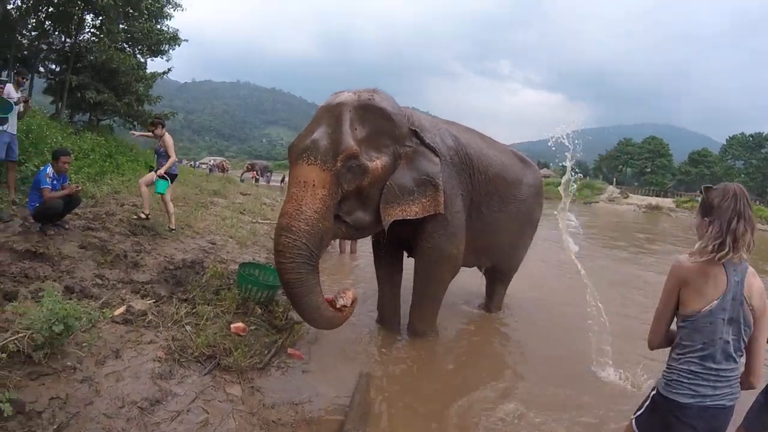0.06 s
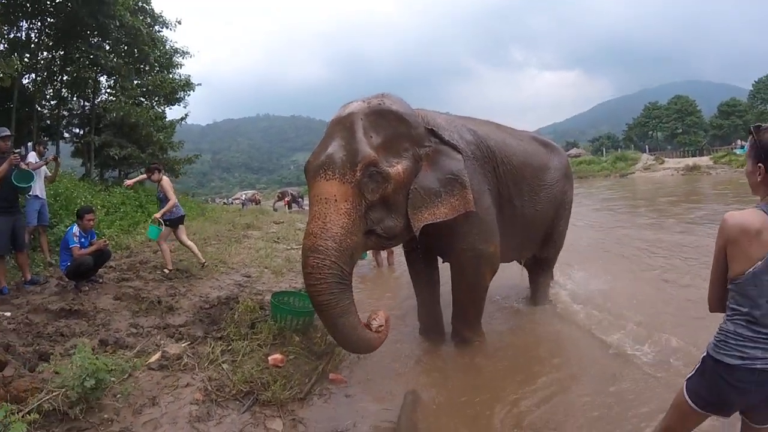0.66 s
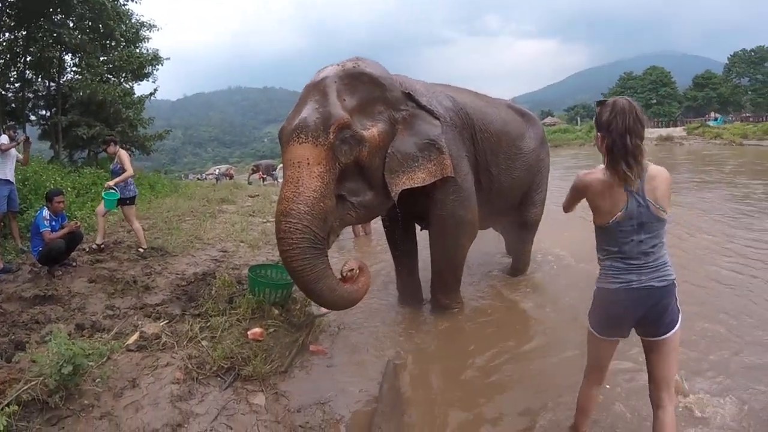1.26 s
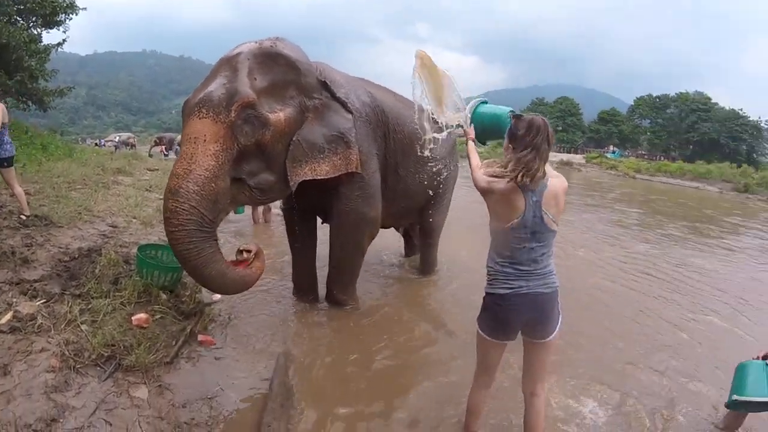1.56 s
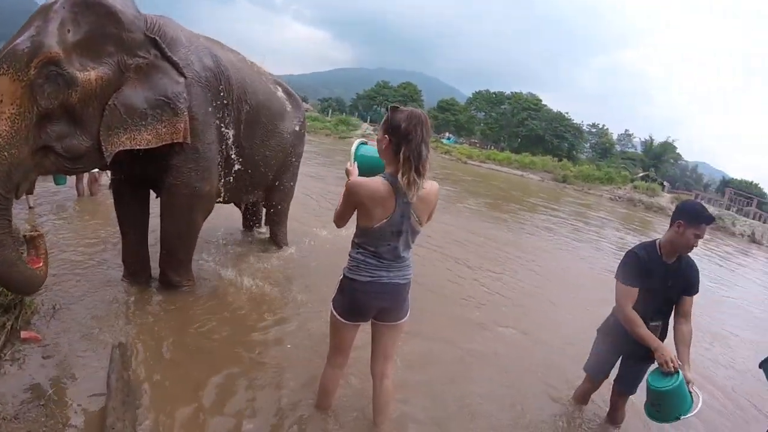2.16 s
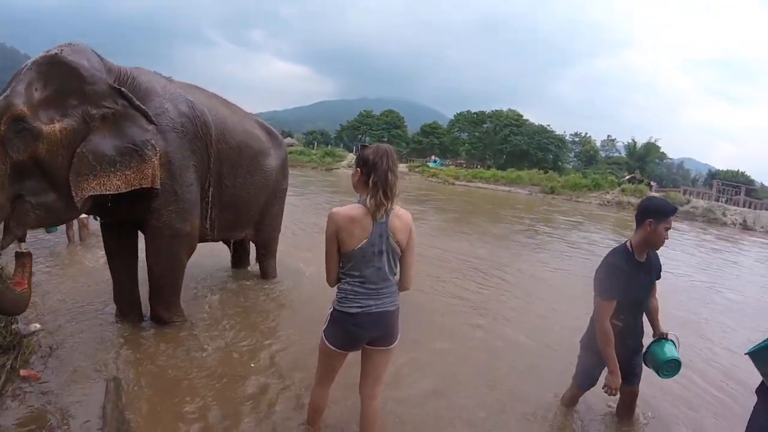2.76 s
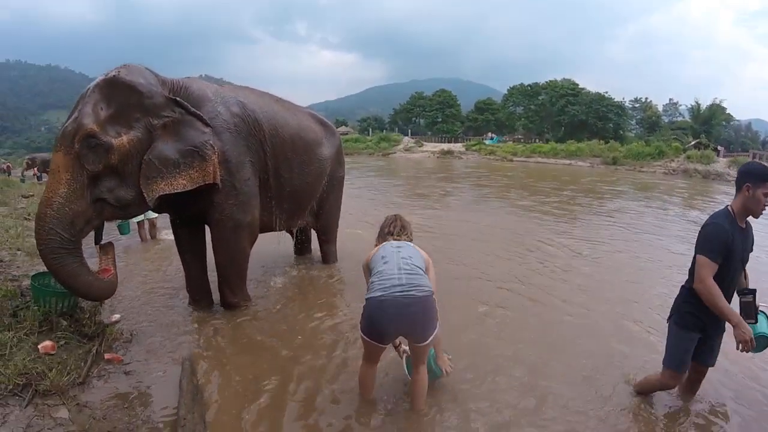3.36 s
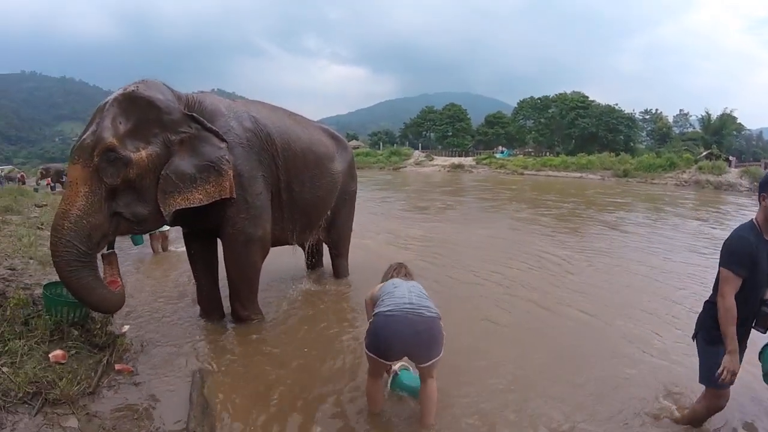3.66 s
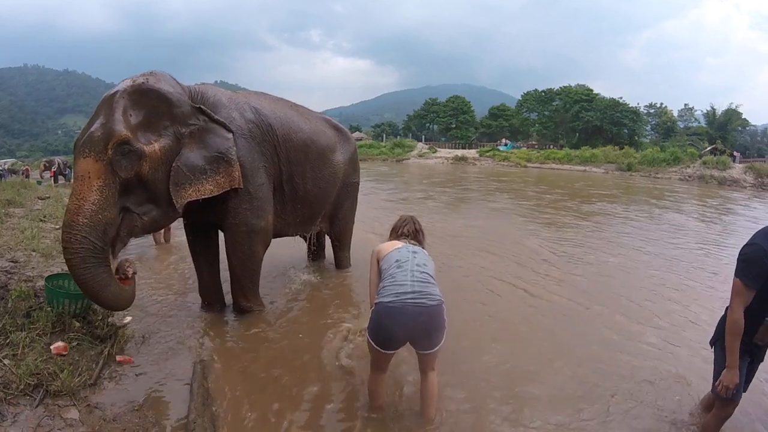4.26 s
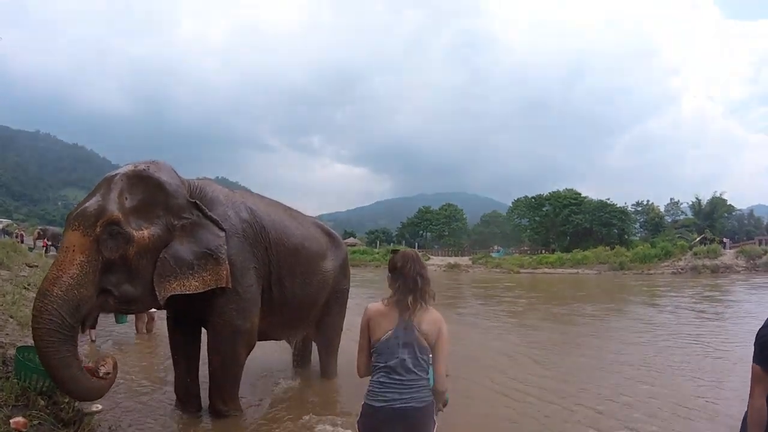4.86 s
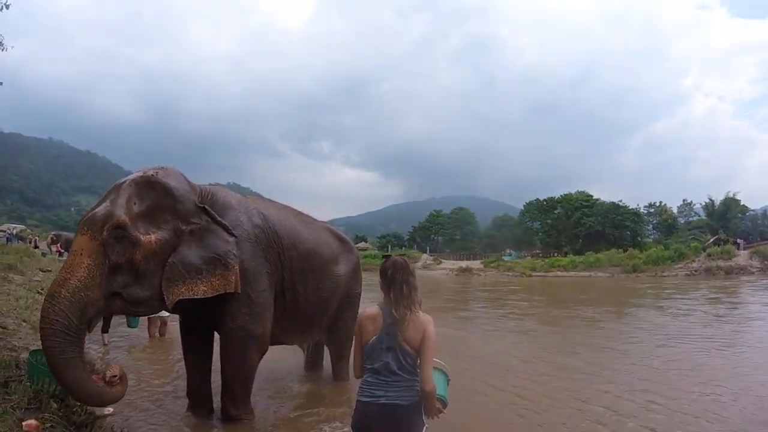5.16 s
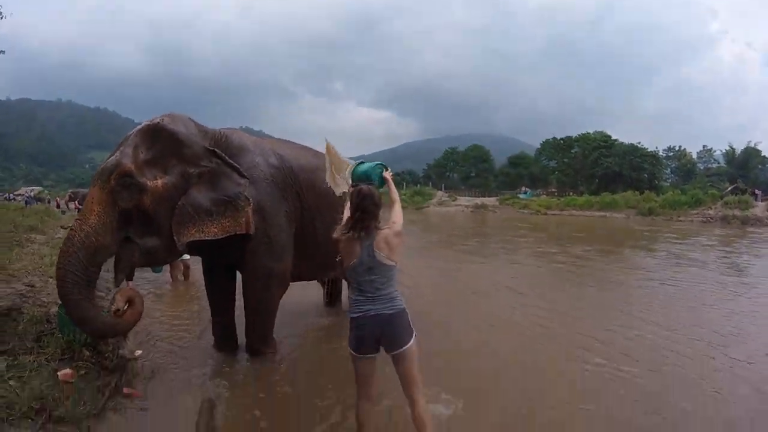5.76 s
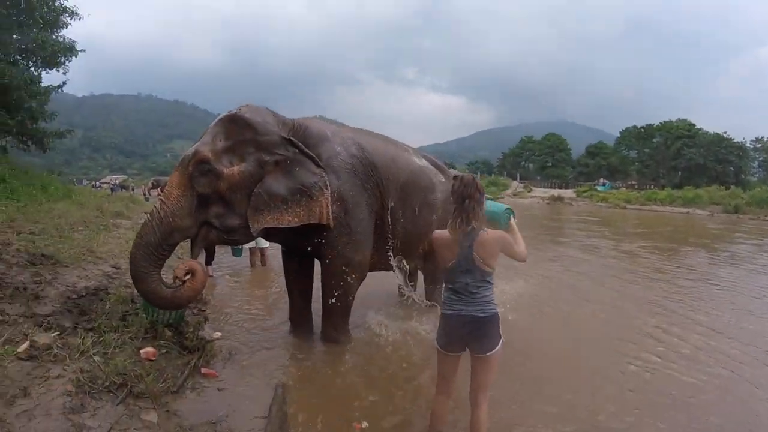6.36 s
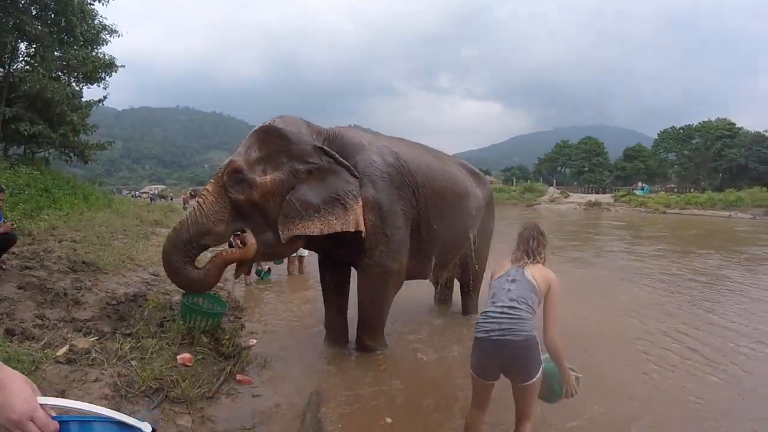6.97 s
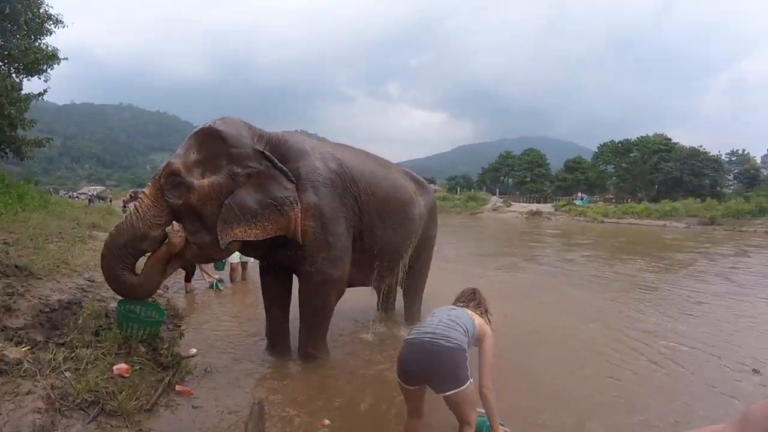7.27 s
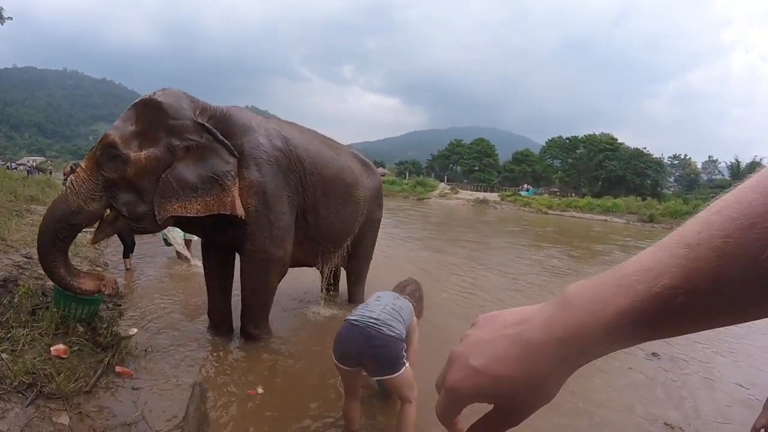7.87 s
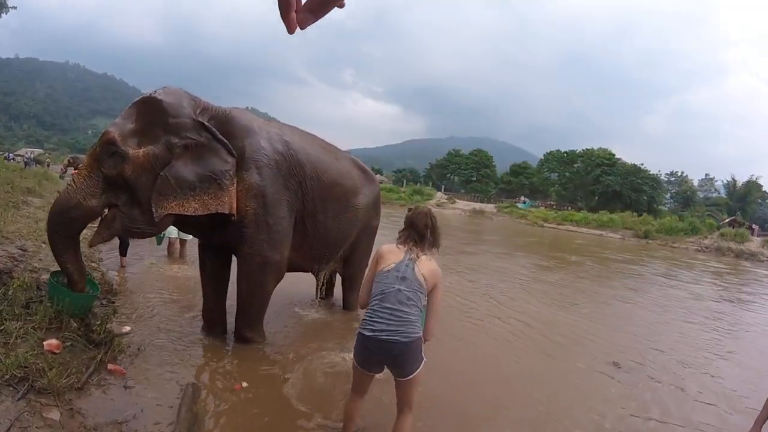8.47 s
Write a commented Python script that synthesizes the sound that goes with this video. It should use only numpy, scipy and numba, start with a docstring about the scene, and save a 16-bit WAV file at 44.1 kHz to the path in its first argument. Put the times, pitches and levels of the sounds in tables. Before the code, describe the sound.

A shallow river washes steadily as buckets of water are thrown over an elephant, landing in fizzy splashes and dripping off. Wading legs and scooping buckets slosh and plop between throws. The water is fairly quiet, heard through the housing of a hand-held camera that rumbles softly. Around halfway, loud sharp knocks hit the housing in two clusters, then more splashing and sloshing follow.

```python
"""Water splashes over the steady wash of a shallow river: buckets are scooped and thrown over an elephant
while people wade nearby. Ringing bubbles make the slosh and plops, tiny drops the spray and run-off.
It is all heard through the housing of a hand-held camera, which adds two narrow rings to the water.
The hand rumbles, jolts and rubs the housing and, from about halfway, knocks sharply on it;
after the hardest knocks a limiter holds everything down."""
import sys
import numpy as np
from scipy import signal
from scipy.fft import rfft, irfft, next_fast_len
from scipy.io import wavfile
from scipy.ndimage import uniform_filter1d, minimum_filter1d
from numba import njit

SR = 44100
rng = np.random.default_rng(int(sys.argv[2]) if len(sys.argv) > 2 else 0)


def generate_wav(sig):
    """Save sig (samples, or channels by samples) to the path in sys.argv[1] as 16-bit PCM at SR."""
    pcm = np.round(np.clip(np.atleast_2d(sig).T, -1, 1) * 32767).astype(np.int16)
    wavfile.write(sys.argv[1], SR, pcm)


N = 380141


def undb(db):
    """Decibels to gain."""
    return 10 ** (np.asarray(db) / 20)


def unit(x):
    """Scale to rms 1."""
    return x / np.sqrt(np.mean(x ** 2))


def colour(x, points):
    """EQ by a curve of (freq_hz, gain_db) points, then scale to rms 1."""
    hz, db = np.transpose(points)
    size = next_fast_len(N)
    bins_hz = np.maximum(np.fft.rfftfreq(size, 1 / SR), 1)
    curve = undb(np.interp(np.log(bins_hz), np.log(hz), db))
    return unit(irfft(rfft(x, size) * curve, size)[:N])


def cut(x, order, hz, kind):
    """Low-, high- or band-pass filter."""
    return signal.sosfilt(signal.butter(order, hz, kind, fs=SR, output="sos"), x)


def drift(rate_hz):
    """Random steps smoothed twice into a wandering line; rms 1."""
    step = int(SR / rate_hz)
    steps = np.repeat(rng.standard_normal(N // step + 1), step)
    return unit(uniform_filter1d(uniform_filter1d(steps, step), step)[:N])


def swell(full_s, hold_s, rise_s, fall_s):
    """Envelope that ramps up to 1 at full_s, holds, then dies away."""
    t = np.arange(N) / SR - full_s
    return np.clip(1 + t / rise_s, 0, 1) * np.exp(-np.maximum(t - hold_s, 0) / fall_s)


def swells(cues, rise_s, fall_s):
    """One envelope for each (full_s, hold_s, level_db) cue."""
    return np.array([undb(db) * swell(s, hold_s, rise_s, fall_s) for s, hold_s, db in cues])


def add(out, start_s, sound):
    """Mix a sound in at start_s."""
    i = max(int(start_s * SR), 0)
    out[i:i + len(sound)] += sound[:max(len(out) - i, 0)]


def modes(table, t):
    """One dying sine per mode; neighbouring modes swing in opposite directions."""
    hz, db, t60_s = np.transpose(table)[:, :, None]
    sides = (-1) ** np.arange(len(table))[:, None]
    return sides * undb(db) * np.sin(2 * np.pi * hz * t) * np.exp(-np.log(1000) * t / t60_s)


@njit
def bubbles(out_size, start_s, hz, cycles, gain, glide):
    """Each bubble rings for some cycles and rises in pitch as it nears the surface."""
    out = np.zeros(out_size)
    for k in range(len(start_s)):
        first, life = int(start_s[k] * SR), int(cycles[k] * SR / hz[k]) + 2
        ring = gain[k] + 0j
        step = np.exp(2j * np.pi * hz[k] / SR - 6 / life)
        bend = np.exp(2j * np.pi * hz[k] / SR * glide / life)
        for i in range(first, min(first + life, out_size)):
            ring *= step
            step *= bend
            out[i] += ring.imag
    return out


def swarm(count, low_hz, high_hz, cycles, scatter_db):
    """Bubbles or drops at random moments; a few are louder, or softer if scatter_db is negative."""
    when, pitch, life, size = rng.random((count, 4)).T
    hz = low_hz * (high_hz / low_hz) ** pitch
    gain = undb(-scatter_db * np.log(1 - .99 * size))
    return bubbles(N, when * N / SR, hz, cycles * (.5 + life), gain, glide=0.12)


def river(level_db=-52.5, drift_db=0.28, ripple_db=-6):
    """The bed: the wide wash of the current, with small ripples in it."""
    # tone of the current: freq_hz, gain_db
    wash_eq = [(30, 4), (110, 0.5), (250, -8), (450, -11.5), (750, -15.5), (1300, -19), (1850, -21.5),
               (2500, -22.5), (3500, -25), (5000, -29.5), (7000, -34), (9500, -39), (13500, -49),
               (16000, -63.5)]
    ripples = unit(swarm(count=12000, low_hz=292.6, high_hz=12070, cycles=3.5, scatter_db=2))
    wash = rng.standard_normal(N) + undb(ripple_db) * unit(np.diff(ripples, prepend=0))
    return colour(wash, wash_eq) * undb(level_db + drift_db * drift(rate_hz=5.1))


def runoff(stray_drip_db=-76.5):
    """Draining water patters into the river in separate drops and thins out to stray drips."""
    # tone of the drops: freq_hz, gain_db
    drop_eq = [(900, -16.5), (1600, -17.5), (2400, -2.5), (3200, -1.5), (3900, -5), (4800, 5.5),
               (5500, -7.5), (6800, -5.5), (8200, -9.5), (10000, -13), (14000, -16), (16000, -49)]
    # water streaming off the flank or a lifted bucket: full_s, hold_s, level_db
    drains = [(.14, 0.53, -68), (2.243, 0.14, -63.5), (2.477, 0.055, -60.5), (3.66, 0.084, -64),
              (6.54, .09, -63.5)]
    drops = colour(swarm(count=7000, low_hz=1480, high_hz=12000, cycles=15, scatter_db=1.5), drop_eq)
    stream_power = sum(swells(drains, rise_s=0.13, fall_s=0.086) ** 2)
    return drops * np.sqrt(stream_power + undb(stray_drip_db) ** 2)


def churn(lap_db=-66, fizz_db=-72.5, foam_db=-6.5, landing_rise_s=0.074):
    """Envelopes of bubbles and spray: landings, their foam and slow strokes over a quiet lap and fizz."""
    # thrown water coming down on the animal or the river: full_s, hold_s, bubbles_db, spray_db
    landings = [(0.124, 0.08, -65, -58.5), (0.262, 0.13, -48.5, -53), (0.34, 0.058, -65, -53.5),
                (0.515, 0.15, -57, -62), (1.673, .01, -61, -63), (1.927, 0.017, -55, -61),
                (2.22, 0.09, -59.5, -61), (2.473, 0.075, -56.5, -56.5), (3.662, .04, -65.5, -60.5),
                (6.254, .08, -70, -59.5), (6.377, 0.084, -58, -58.5), (6.524, 0.1, -54.5, -54.5)]
    # legs and buckets pushed through the river: full_s, hold_s, bubbles_db, spray_db
    strokes = [(0.215, 0.82, -56, -67), (0.933, 0.41, -55.5, -67), (2.953, 0.11, -87, -68),
               (3.397, 0.13, -62.5, -66), (3.68, 0.32, -60, -64), (4.223, 0.32, -57.5, -62),
               (5.098, 0.24, -52.5, -66), (5.485, 0.61, -71, -67.5), (6.8, 0.073, -61.5, -67),
               (7.183, 0.17, -59, -64.5), (7.4, 0.6, -59.5, -64), (8.17, 0.36, -57, -61)]
    power = undb([[lap_db], [fizz_db]]) ** 2
    for full_s, hold_s, bubbles_db, spray_db in landings:
        splash = swell(full_s, hold_s, landing_rise_s, fall_s=0.045)
        foam = undb(foam_db) * swell(full_s, hold_s, landing_rise_s, fall_s=0.28)
        power = power + (undb([[bubbles_db], [spray_db]]) * np.maximum(splash, foam)) ** 2
    for full_s, hold_s, bubbles_db, spray_db in strokes:
        push = swell(full_s, hold_s, rise_s=0.11, fall_s=0.16)
        power = power + (undb([[bubbles_db], [spray_db]]) * push) ** 2
    return np.sqrt(power)


def gobs(count, fall_s, share, scatter_db=0.8):
    """Water arrives in gobs: a gain near 1 that jumps at random moments and falls back."""
    when, size = rng.random((count, 2)).T
    gain = undb(-scatter_db * np.log(1 - .97 * size))
    hits = np.bincount((when * N).astype(int), gain ** 2, N)
    power = signal.lfilter([1], [1, -np.exp(-1 / (fall_s * SR))], hits)
    return np.sqrt(1 - share + share * power / power.mean())


def splashes(slosh_db=-1.65, gulp_db=-9.5, flutter_db=0.08):
    """Churned water rings with bubbles and larger gulps; thrown water lands as a spattering fizz."""
    # tone of the bubbles: freq_hz, gain_db
    slosh_eq = [(400, -18), (800, -13), (1150, 2), (1380, 3), (1600, -0.5), (1900, -16.5), (2500, -13),
                (3200, -13), (5000, -17)]
    # tone of the fine drops: freq_hz, gain_db
    spray_eq = [(900, -16), (1900, -11), (2550, 0), (3100, -8), (3600, 3), (4300, -8), (5000, -9.5),
                (5950, -8), (6700, -4.5), (7800, -9), (8500, -16), (11000, -27), (14000, -20.5),
                (16000, -63.5)]
    slosh = colour(swarm(count=14000, low_hz=618.5, high_hz=3570, cycles=22.5, scatter_db=1.5), slosh_eq)
    spray = colour(swarm(count=22000, low_hz=1390, high_hz=14200, cycles=7.2, scatter_db=-3.5), spray_eq)
    gulps = unit(swarm(count=420, low_hz=1070, high_hz=1474, cycles=24, scatter_db=1))
    spatter = spray * gobs(count=600, fall_s=0.0058, share=0.47)
    bubbling = slosh * undb(slosh_db) + gulps * undb(gulp_db)
    bubble_level, spray_level = churn()
    return (bubbling * bubble_level + spatter * spray_level) * undb(flutter_db * drift(rate_hz=24))


def plops(cycles=14, detune=0.049, count=14, follow_db=-7, band_ratio=1.58):
    """A plop traps a small cluster of bubbles at uneven moments, the first the loudest."""
    # single plops of water: start_s, peak_db, pitch_hz, cluster_s
    cues = [(0.297, -35, 1250, 0.014), (0.366, -40, 1180, 0.014), (1.17, -39, 1120, 0.015),
            (1.757, -48, 6400, 0.006), (1.934, -42, 1290, 0.014), (2.428, -34, 1310, 0.017),
            (2.635, -46.5, 1310, 0.014), (2.95, -49, 2320, .015), (3.163, -46, 1300, 0.0075),
            (3.245, -45.5, 4730, 0.0051), (3.436, -46, 2300, 0.017), (3.557, -47, 2300, 0.01),
            (3.629, -46, 1480, 0.0073), (3.769, -44, 1320, 0.0085), (3.846, -34.5, 1270, 0.0074),
            (4.21, -49, 6940, 0.0048), (4.259, -41, 1270, 0.0063), (5.249, -38.5, 1177, 0.007),
            (6.24, -43, 1390, 0.0048), (6.3, -41.5, 1230, 0.01), (6.339, -39, 1294, 0.0076),
            (6.53, -42, 1390, .008), (7.424, -37.5, 1170, 0.0063), (7.491, -43, 1330, 0.01),
            (7.57, -42, 2480, .008), (7.838, -48, 1370, 0.0083)]
    out = np.zeros(N)
    for start_s, peak_db, pitch_hz, cluster_s in cues:
        pitch, life = rng.standard_normal((2, count))
        lag = np.append(0, rng.random(count - 1))
        gain = np.exp(-lag) * undb(follow_db * (lag > 0))
        hz = pitch_hz * np.exp(detune * pitch * np.sqrt(lag))
        ring_cycles = cycles * np.exp(.35 * life * lag)
        cluster = bubbles(SR // 8, cluster_s * lag, hz, ring_cycles, gain, glide=0.05)
        # heard from a few metres off, their edges are soft
        plop = cut(cluster, 2, [pitch_hz / band_ratio, pitch_hz * band_ratio], "band")
        add(out, start_s, undb(peak_db) * plop / abs(plop).max())
    return out


def slaps(rise_s=.001, band_ratio=1.49):
    """A sheet of water lands all at once: a crisp burst of tiny drops that dies away quickly."""
    # sheets of water hitting the hide or the river: start_s, peak_db, centre_hz, fall_s
    sheets = [(.095, -48.5, 5000, .016), (.147, -45.5, 5100, .016), (1.666, -43.5, 2700, .006),
              (1.927, -48.5, 3800, .022), (2.43, -31, 1820, 0.0089), (2.25, -43, 3900, 0.01),
              (6.374, -38.5, 3100, .006), (6.598, -42.5, 3500, .01)]
    out = np.zeros(N)
    t = np.arange(SR // 8) / SR
    for start_s, peak_db, centre_hz, fall_s in sheets:
        drops = rng.laplace(size=len(t)) * (1 - np.exp(-t / rise_s)) * np.exp(-t / fall_s)
        slap = cut(drops, 3, [centre_hz / band_ratio, centre_hz * band_ratio], "band")
        add(out, start_s, undb(peak_db) * slap / abs(slap).max())
    return out


def through_housing(x, low_hz=3540, high_hz=6400, low_db=(1, 3.5), high_db=2.5, regrip_s=4.5):
    """Outside sound picks up two narrow rings; the lower grows as the hand shifts its grip."""
    low_ring = signal.lfilter(*signal.iirpeak(low_hz, low_hz / 400, fs=SR), x)  # 400 Hz wide
    high_ring = signal.lfilter(*signal.iirpeak(high_hz, high_hz / 350, fs=SR), x)
    boost_db = np.interp(np.arange(N) / SR, [regrip_s, regrip_s + 0.19], low_db)
    return x + (undb(boost_db) - 1) * low_ring + (undb(high_db) - 1) * high_ring


def grip(rest_db=-41):
    """The grip rumbles through the housing, more with each squeeze."""
    # tone of the handling rumble: freq_hz, gain_db
    rumble_eq = [(5, -11.5), (12, 6), (22, -10.5), (45, -14.5), (90, -33), (180, -45), (400, -50.5),
                 (1200, -116)]
    # fingers tightening on the housing: full_s, hold_s, level_db
    squeezes = [(3.948, 0.066, -32.5), (4.533, 0.41, -20), (5.0, 0.56, -28), (5.712, 0.18, -21.5),
                (8.383, 0.15, -37.5)]
    squeeze_power = sum(swells(squeezes, rise_s=0.16, fall_s=0.053) ** 2)
    return colour(rng.standard_normal(N), rumble_eq) * np.sqrt(undb(rest_db) ** 2 + squeeze_power)


def rubs():
    """Skin drags briefly over the housing with a low scuff."""
    # tone of the friction: freq_hz, gain_db
    skin_eq = [(40, -22), (90, 8.5), (150, -3.5), (260, -16), (700, -66.5)]
    # drags of the skin: full_s, hold_s, level_db
    drags = [(0.535, 0.022, -50.5), (3.72, 0.048, -52), (4.025, 0.025, -47.5), (4.388, .08, -47),
             (6.853, 0.034, -55), (8.434, 0.056, -43)]
    return colour(rng.standard_normal(N), skin_eq) * sum(swells(drags, rise_s=0.053, fall_s=0.049))


def jolts(ref_hz=26.07, ref_db=-26.5, octaves_per_db=0.0365, width_cycles=0.62):
    """A jolt rocks the camera for a cycle or two; a harder one rocks it more slowly."""
    # soft jolts of the hand, mostly at walking pace: centre_s, peak_db
    cues = [(0.273, -25), (0.919, -21.5), (1.524, -27), (2.141, -33.5), (2.737, -26.5), (3.316, -21.5),
            (3.888, -26.5), (4.485, -6), (4.53, -28.5), (5.75, -19.5), (5.848, -19), (6.218, -26),
            (6.858, -24), (7.423, -30.5)]
    out = np.zeros(N)
    t = np.arange(-SR // 6, SR // 6) / SR
    for centre_s, peak_db in cues:
        hz = ref_hz * 2 ** (octaves_per_db * (ref_db - peak_db))
        rock = -np.cos(2 * np.pi * hz * t) * np.exp(-(hz * t / width_cycles) ** 2)
        add(out, centre_s + t[0], undb(peak_db) * rock)
    return out


def thud(hz, cycles=0.54):
    """A dull push on the camera body and its low ring; peak 1."""
    # low modes of the body: pitch_hz, level_db, t60_s
    body = [(150, -9.5, 0.037), (337, -13, 0.02), (382, -16, 0.0082)]
    t = np.arange(SR // 10) / SR
    push = np.sin(2 * np.pi * hz * t) * np.exp(-t * hz / cycles) + modes(body, t).sum(axis=0)
    return -push / abs(push).max()


def bumps(pitch_hz=170):
    """A fingertip bumps the body: all thud, no click."""
    # fingertip bumps: start_s, peak_db
    cues = [(4.818, -31), (5.492, -33.5), (5.701, -30)]
    out = np.zeros(N)
    for start_s, peak_db in cues:
        add(out, start_s, undb(peak_db) * thud(pitch_hz))
    return out


def crack(t, edge_hz, rebound_s, rebound, snap_gain=7, grit_s=0.0045):
    """The contact of a knock: a sharp snap, its rebound and a little grit, rolled off above edge_hz."""
    snap = snap_gain * ((t == 0) + rebound * np.sinc((t - rebound_s) * SR))
    grit = .5 * rng.standard_normal(len(t)) * np.exp(-t / grit_s)
    return cut(snap + grit, 4, [edge_hz / 5.5, edge_hz], "band") * np.sqrt(SR / 2 / edge_hz)


def knocks(crack_db=-5, leak=.032, place_depth=0.48, tick_hz=8000):
    """A knock cracks, rings the modes near its pitch and thuds the body; the finger mutes the shell."""
    # knocks on the housing: start_s, click_db, pitch_hz, spread_octaves, place (0-1 along the shell),
    # rebound_s, rebound (share of the first hit), thud_db, thud_hz, tick_db, mute_s
    hits = [(4.1856, -5.5, 1740, 1.06, 0, 0.00046, 0.77, -27, 158, -40, .03),
            (4.509, -7, 2280, 0.92, 0.34, 0.0012, .3, -14.5, 122, -45, 0.0061),
            (4.5182, -22.5, 1810, 0.8, .2, 0.0014, .4, -17.5, 150, -50, .005),
            (4.5207, -18, 1100, .79, .5, 0.00065, 0.47, -3, 85.4, -65, .005),
            (4.529, -16, 1560, 1.7, .11, .00041, .5, -2.5, 60.7, -55, 0.0042),
            (4.5712, -16, 897, 1.2, .5, 0.0006, 0.64, -13.5, 140, -54, .006),
            (4.581, -29, 1405, 1.2, .3, 0.0022, .4, -8.5, 59, -56, .005),
            (4.6036, 1.5, 4300, 1.23, 0.95, .00102, 0.27, -5, 66.1, -26.5, 0.0074),
            (5.5434, -35, 1950, 0.096, 0.83, 0.00214, .4, -32.5, 206, -70, .008),
            (5.607, -43, 1990, 0.55, .4, 0.00086, .4, -50, 110, -67, .006),
            (5.734, -37, 2840, 2, 0.58, 0.00078, 0.5, -39, 201, -65, .006),
            (5.7651, -15, 2260, 0.4, 0.82, 0.0008, 0.59, -21, 230, -72, .01),
            (5.8547, -17, 1680, 0.8, 0.35, 0.0014, 0.37, -19, 150, -56, 0.0055),
            (5.8674, 7, 5980, 1.67, 0, .0021, 0.3, 0.5, 64.3, -20, 0.0067),
            (7.972, -16.5, 2400, 1.06, .545, 0.0021, .2, -26.5, 130, -35, 0.0097)]
    # modes of the housing: pitch_hz, level_db, t60_s
    housing = [(1100, 2, 0.02), (1653, 4.5, .0063), (2076, 3, 0.0065), (2102, -9.5, 0.048),
               (2260, -6, 0.034), (2500, -6.5, 0.016), (2900, -10.5, 0.014), (3387, 1.5, 0.017),
               (3710, -1.5, 0.012), (4430, 1, 0.013), (4840, -6.5, 0.015), (5380, -5, 0.0095),
               (5830, -8.5, 0.016), (6040, -11, 0.01), (7000, -9, .008), (7780, -13.5, 0.0063),
               (10140, -16, 0.006), (11900, -16, 0.0062), (14300, -24, 0.0035)]
    out = np.zeros(N)
    t = np.arange(SR // 10) / SR
    mode_hz = np.array(housing)[:, 0]
    for (start_s, click_db, pitch_hz, spread_octaves, place,
         rebound_s, rebound, thud_db, thud_hz, tick_db, mute_s) in hits:
        weight = 1 / np.sqrt(1 + (np.log2(mode_hz / pitch_hz) / spread_octaves) ** 4) + leak
        # each mode answers more or less, depending on where the shell is struck
        weight *= 1 + place_depth * np.cos(np.pi * place * np.arange(1, len(mode_hz) + 1))
        # the contact rebounds at once, feeding some modes and stopping others
        shell = modes(housing, t) + rebound * modes(housing, np.maximum(t - rebound_s, 0))
        edge_hz = min(0.92 * pitch_hz * 2 ** spread_octaves, 5200)  # a harder contact cracks further up
        attack = undb(crack_db) * crack(t, edge_hz, rebound_s, rebound)
        ring = cut(weight @ shell + attack, 4, 1.55 * edge_hz, "low")
        # a hard edge, such as a fingernail, also wakes the highest modes in a brief bright tick
        tick = cut(shell.sum(axis=0), 4, tick_hz, "high")
        click = undb(click_db) * ring / abs(ring).max() + undb(tick_db) * tick / abs(tick).max()
        mute = np.exp(-(t / mute_s) ** 2)
        add(out, start_s, click * mute + undb(thud_db) * thud(thud_hz))
    return out


def scene():
    """The mono mix: water heard through the housing, and the hand on the camera."""
    water = river() + splashes() + runoff() + plops() + slaps()
    handling = grip() + rubs() + jolts() + bumps() + knocks()
    return (through_housing(water) + handling)[None]


@njit
def limiter(peaks, ceiling, hold_s, release_s):
    """Gain that drops at once on a peak, stays down for a while and then creeps back."""
    gain, reduction, wait = np.empty(len(peaks)), 0., 0.
    for i in range(len(peaks)):
        over = np.log(peaks[i] / ceiling + 1e-9)
        if over > reduction:
            reduction, wait = over, hold_s * SR
        elif wait > 0:
            wait -= 1
        else:
            reduction -= reduction / (release_s * SR)
        gain[i] = np.exp(-reduction)
    return gain


def record(dry, top_hz=16000):
    """The camera limits peaks, looking a moment ahead, and cuts the top."""
    peaks = -minimum_filter1d(-abs(dry[0]), size=64)
    limited = dry * limiter(peaks, ceiling=0.6, hold_s=0.32, release_s=0.22)
    return signal.sosfilt(signal.ellip(8, .2, 80, top_hz, fs=SR, output="sos"), limited)


dry = scene()
out = record(dry)
generate_wav(out)
```